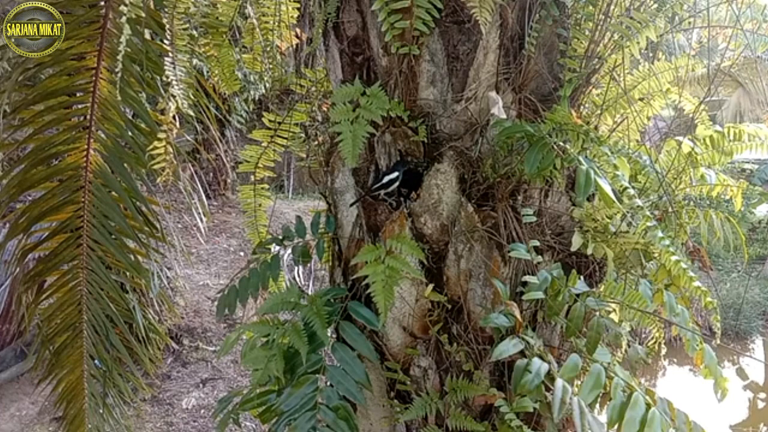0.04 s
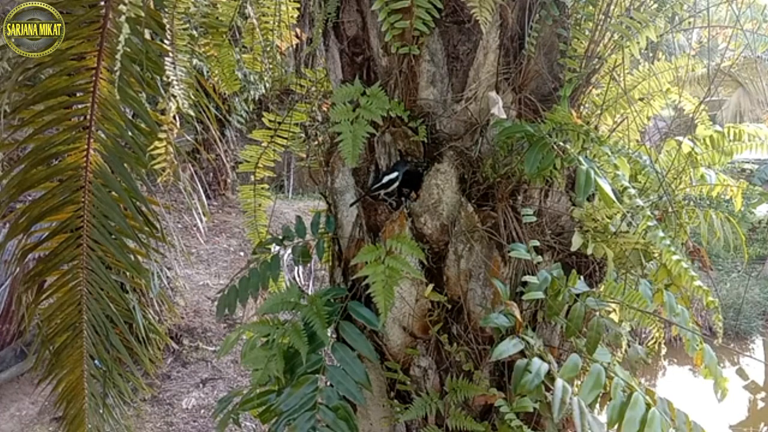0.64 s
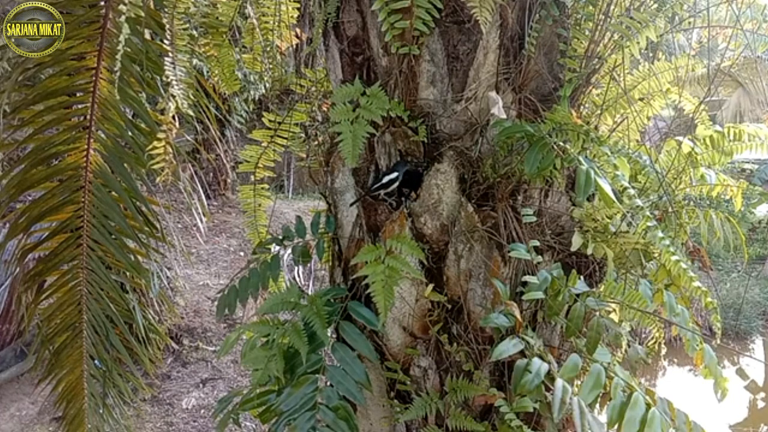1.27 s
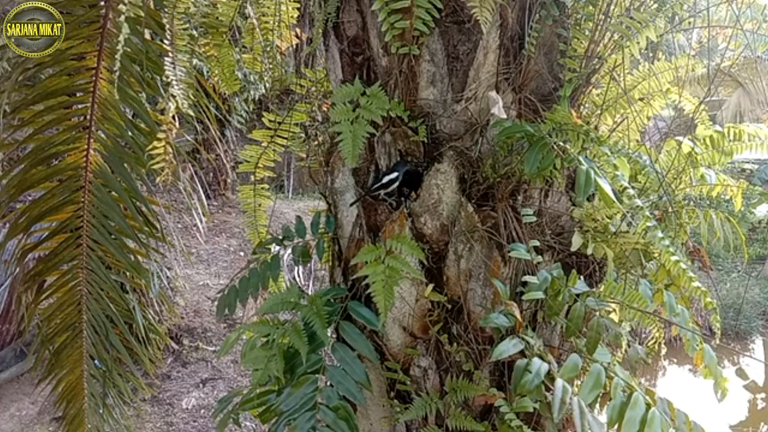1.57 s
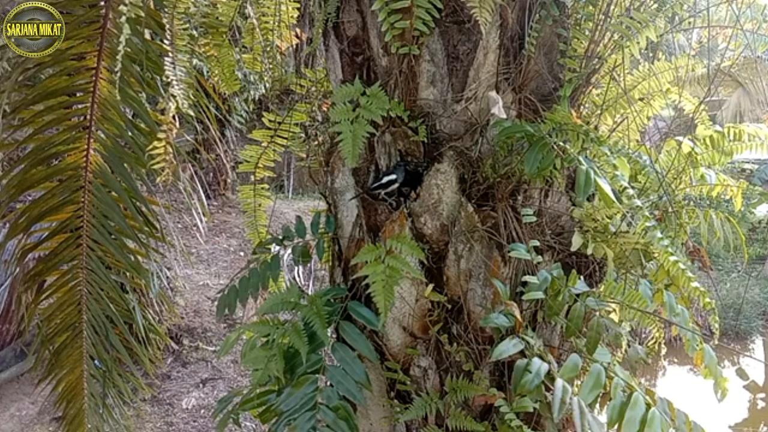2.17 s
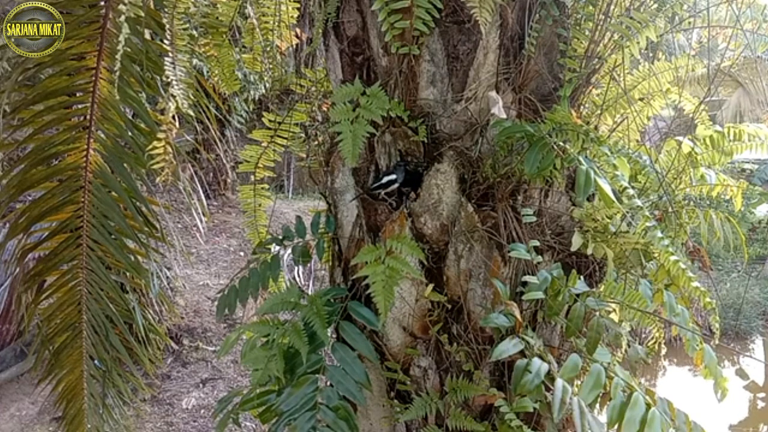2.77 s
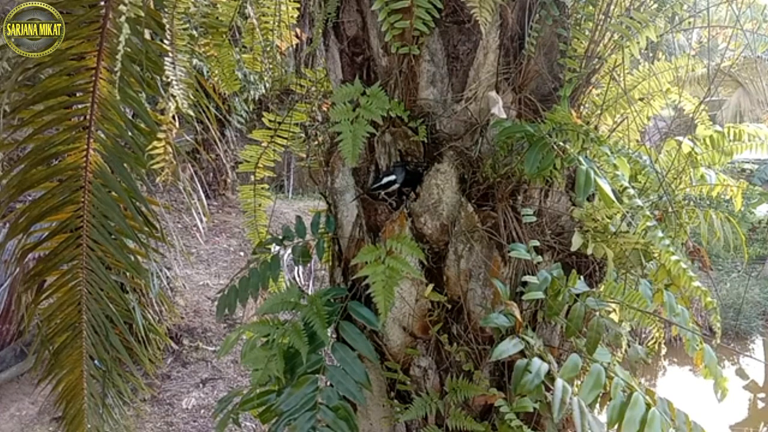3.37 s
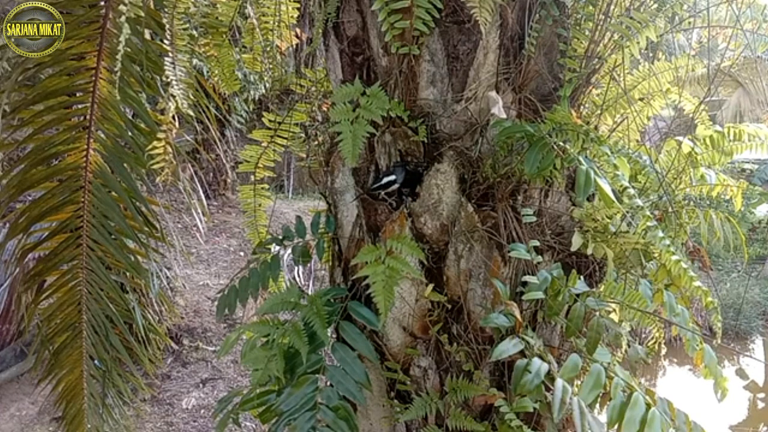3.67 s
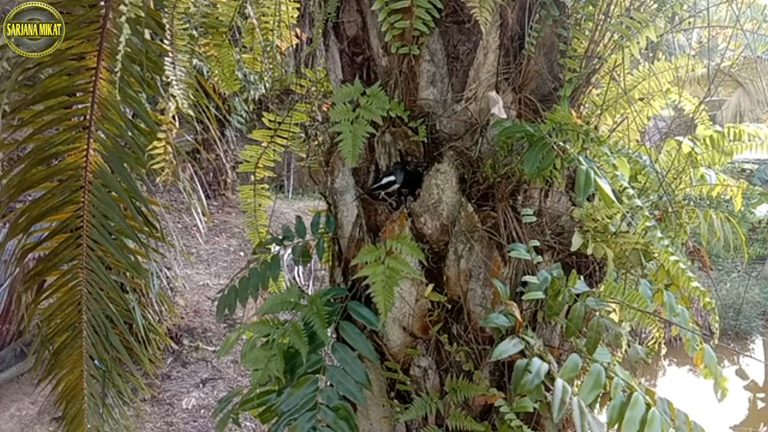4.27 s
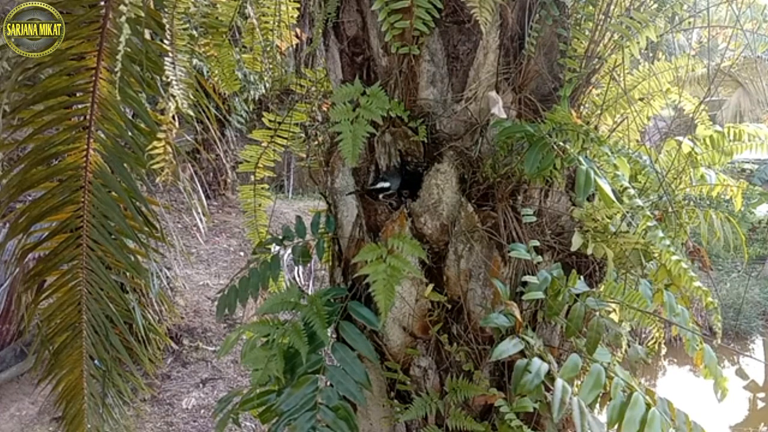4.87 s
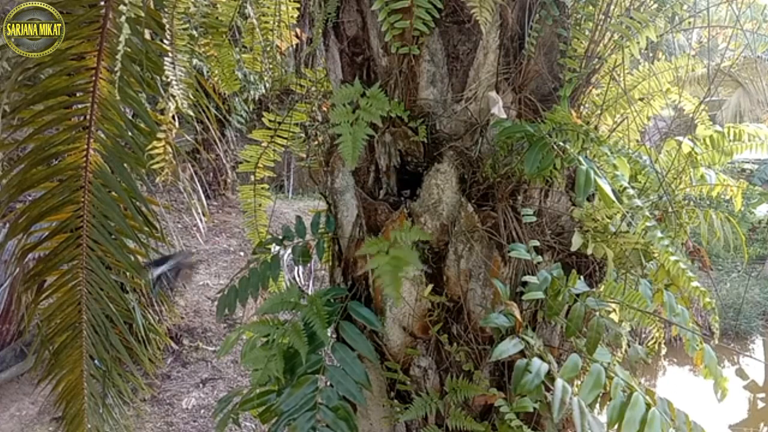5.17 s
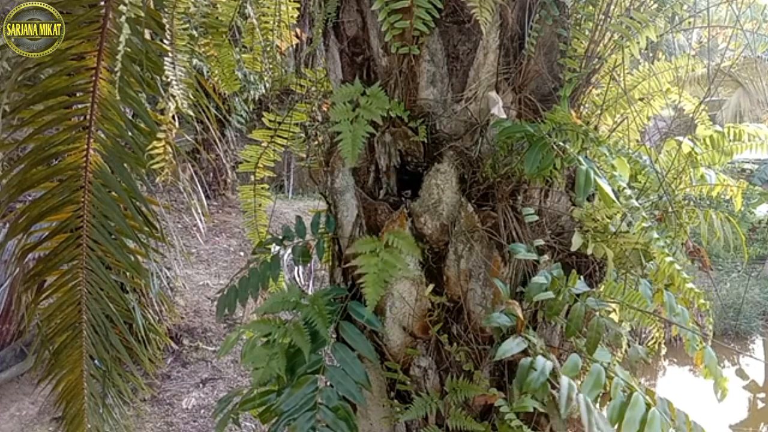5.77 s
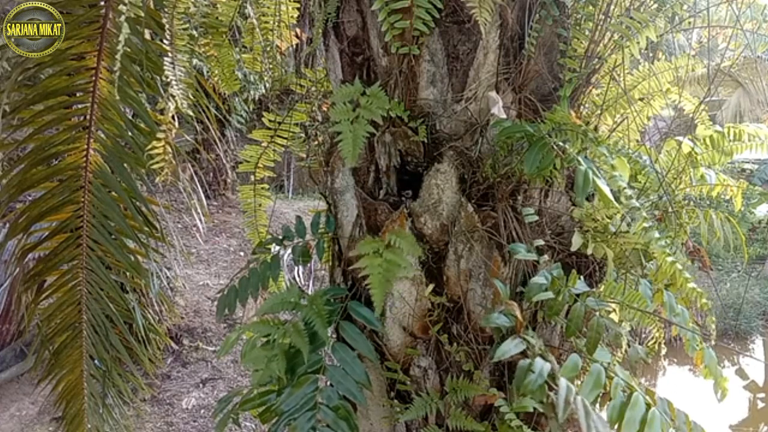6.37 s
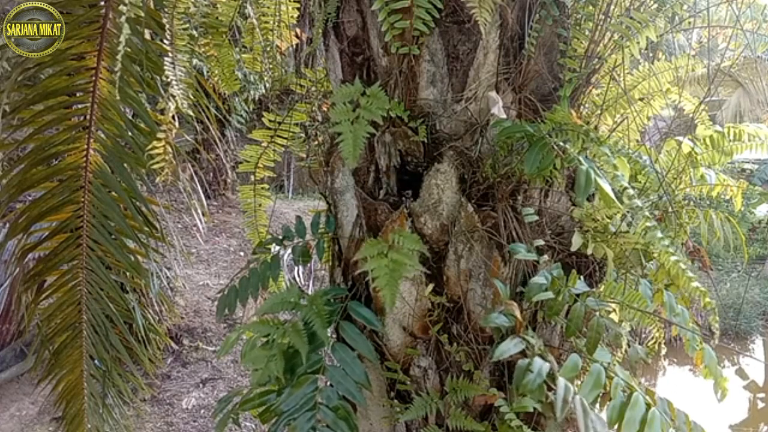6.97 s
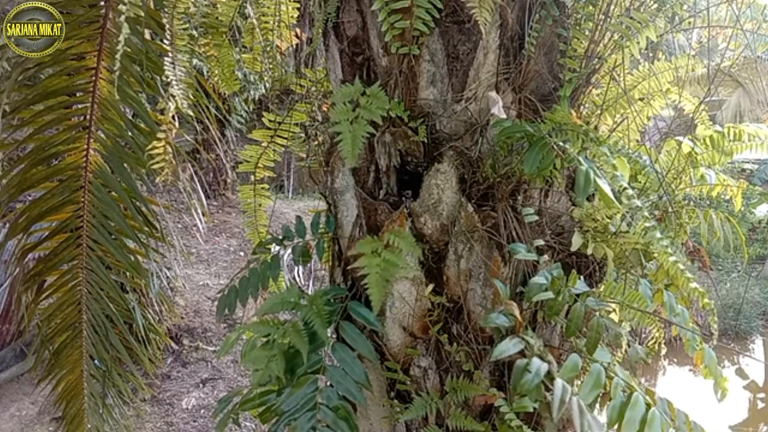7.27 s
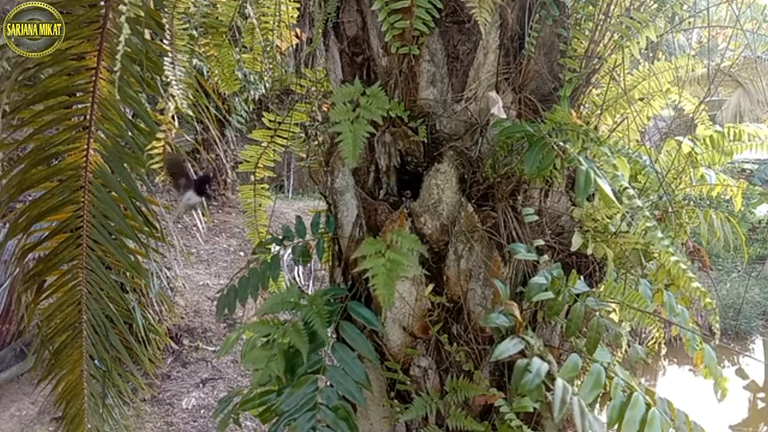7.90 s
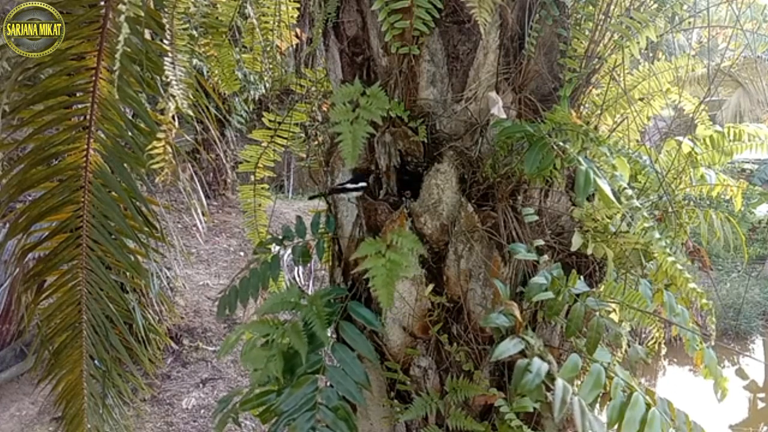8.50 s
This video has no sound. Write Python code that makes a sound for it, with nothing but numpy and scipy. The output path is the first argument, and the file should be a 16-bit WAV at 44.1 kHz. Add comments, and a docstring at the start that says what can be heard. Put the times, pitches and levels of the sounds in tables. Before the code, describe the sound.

Several chicks beg close by from a hollow in a palm trunk, their shrill, trilling calls overlapping from the start. They turn hoarser after a couple of seconds, then grow quieter and sparser in the second half. A parent bird's wings flutter very faintly away and later back. Farther off in the trees a songbird whistles and other birds peep over a soft outdoor hush and thin insect hiss.

```python
"""Magpie-robin chicks beg from a hollow in a palm trunk, their shrill calls overlapping from the start.
Each call opens as a thin squeak, swells into a trill of about 44 sweeps a second, sags and slides off.
Farther away a songbird whistles and other birds peep and coo over faint insects. After two seconds the
chicks grow hoarse; a far bird rasps, and the songbird returns. Past five seconds a parent flutters
away, the begging thins out, and near the end the parent flutters back."""
import sys
import numpy as np
from scipy import signal
from scipy.fft import rfft, irfft
from scipy.io import wavfile

SR = 44100
rng = np.random.default_rng(int(sys.argv[2]) if len(sys.argv) > 2 else 0)


def unload_wav(signal):
    """Save mono or channel-first audio to the path in sys.argv[1] as 16-bit WAV at rate SR, clipped to [-1, 1]."""
    wavfile.write(
        sys.argv[1],
        SR,
        np.round(np.clip(np.atleast_2d(signal).T, -1, 1) * 32767).astype(np.int16),
    )


N = 376613


def shrill_chick():
    """The highest voice in the nest, with the widest, most throbbing trill."""
    # Each row: start, length and time to the crest in seconds, crest pitch in Hz,
    # crest effort in dB, overtones in dB.
    calls = [(-0.2, 0.62, 0.32, 6325, -21.5, -25), (0.87, 0.51, 0.26, 6430, -18.5, -28),
             (2.02, 0.59, 0.31, 6380, -16.5, -22), (3.3, 0.64, .32, 6383, -17.5, -26),
             (4.32, 0.47, .22, 6375, -18, -41), (5.17, 0.53, .27, 6366, -18, -40),
             (6.28, 0.46, 0.13, 6460, -28, -29), (7.72, 0.37, 0.18, 6670, -39.5, -35)]
    # The contour of a call: squeak, build, sag and release, in seconds, Hz and dB as named.
    shape = dict(squeak_s=0.08, squeak_hz=833, squeak_db=20, build_hz=755, build_db=9, sag_hz=209.2, sag_db=5, release_s=.09, release_hz=577, release_db=35)
    return chick(calls, shape, sweep_hz=522, throb_db=7.8, second_db=-6, hiss_db=-34)


def harsh_chick():
    """A lower chick that rasps hard with the second side of its syrinx."""
    # Calls and contour, laid out as for the shrill chick.
    calls = [(0.2, 0.66, 0.19, 5273, -19, -14), (1.02, .56, 0.16, 5385, -19.5, -20.5),
             (2.02, .64, 0.16, 5430, -17.5, -14.5), (2.9, .59, 0.075, 5277, -21, -11.5),
             (3.72, .6, .18, 5175, -18, -15.5), (4.6, .47, .3, 5070, -22.5, -24),
             (5.37, 0.56, 0.33, 5153, -18, -18.5)]
    shape = dict(squeak_s=.13, squeak_hz=354.5, squeak_db=3, build_hz=-120, build_db=13, sag_hz=402.3, sag_db=4.5, release_s=0.055, release_hz=60, release_db=25)
    return chick(calls, shape, sweep_hz=457, throb_db=5.3, second_db=6, hiss_db=-39.5)


def soft_chicks():
    """Smoother voices that ease into a narrow trill and sometimes overlap."""
    # Calls and contour, laid out as for the shrill chick.
    calls = [(-0.25, .315, 0.29, 5856, -15, -31), (0.35, .44, .28, 5406, -13.5, -38),
             (1.59, .23, .15, 5630, -26, -35), (1.92, 0.81, 0.41, 5527, -17.5, -12.5),
             (2.57, 0.41, 0.3, 5475, -18.5, -52), (3.2, 0.31, 0.17, 5235, -16, -20),
             (4.05, .42, 0.32, 4980, -19.5, -54), (4.82, .45, 0.35, 5350, -20.5, -46),
             (5.6, 0.39, 0.3, 5340, -20, -32.5), (6.2, 0.54, .22, 5467, -21, -24),
             (6.5, 0.25, 0.26, 4880, -28, -36), (7.07, 0.51, 0.22, 5427, -26.5, -32),
             (7.2, 0.36, 0.23, 4956, -26.5, -49.5), (7.67, 0.44, 0.11, 5700, -42.5, -35),
             (8.05, .44, 0.21, 5405, -23, -29), (8.15, 0.33, 0.24, 4957, -22, -41)]
    shape = dict(squeak_s=.09, squeak_hz=360.7, squeak_db=27, build_hz=285.8, build_db=12.5, sag_hz=304.2, sag_db=10, release_s=.06, release_hz=201, release_db=15)
    return chick(calls, shape, sweep_hz=390, throb_db=4, second_db=-2, hiss_db=-41.5)


def chick(calls, shape, **voice):
    """A run of begging calls in one voice."""
    out = np.zeros(N)
    for call in calls:
        add(out, *begging_call(call, shape, **voice))
    return out


def begging_call(call, shape, sweep_hz, throb_db, second_db, hiss_db):
    """A whistle swept up and down by the two-sided syrinx; returns its start and its sound."""
    # The voices grow hoarse as the begging wears on. Each row: time in seconds, hoarseness in dB.
    hoarseness = [(1.6, -13), (2.1, -3.5), (5.9, -3), (6.3, 2.5)]
    # The colour of beak and hollow. Each row: frequency in Hz, gain in dB.
    beak_colour = [(3500, -12), (5500, -1.5), (6700, -7), (7800, 7.5), (9500, 3.5), (11100, -14.5),
                   (12000, -19.5), (15000, -14)]
    # The breath in a call. Each row: frequency in Hz, noise density in dB.
    hiss_colour = [(950, -31), (1270, 7.5), (1500, -13.5), (1850, -2), (2300, -6), (3150, 3), (3650, 14),
                   (4300, -5.5), (7000, 21.5), (9500, 2), (11000, 0), (12300, -2.5), (14900, 1)]
    slide_s, slide_hz, push_db = .04, 1336, 4
    throat_hz, throat_width_hz, throat_db = 2800, 210, -52
    start, length, crest_s, crest_hz, crest_db, overtone_db = call
    age, bend_hz, drop_db = call_contour(length, crest_s, **shape)
    size = len(age)
    hoarse_db = np.interp(start + age, *np.transpose(hoarseness))
    # the uneven trill slows and widens as the call builds
    rate_hz = 42 + 18 * np.exp(-age / .13) + 3.6 * noise_band(size, 0, 25)
    cycle = 2 * np.pi * (np.cumsum(rate_hz) / SR + rng.random())
    opening = 1 - np.exp(-(age / .13) ** 2)
    # each sweep jumps up quickly and falls more slowly; the last one plunges
    sweep = np.cos(cycle + .3 * np.cos(cycle))
    slide = np.clip(1 - (length - age) / slide_s, 0, 1)
    hz = crest_hz + bend_hz + sweep_hz * opening * (1 - slide) * sweep - slide_hz * slide
    jitter_hz = 70 * noise_band(size, 0, 60) + (130 - 80 * opening) * noise_band(size, 0, 450)
    phase = 2 * np.pi * np.cumsum(hz + jitter_hz) / SR
    # the fall of each sweep is its loud part; the hoarser the voice, the more air in the last slide
    pulse_db = throb_db * opening * (np.sin(cycle + .6) - .25)
    effort_db = crest_db - drop_db + (push_db + hoarse_db) * slide
    level = gain_of(effort_db + pulse_db + 1.9 * noise_band(size, 0, 80))
    # the second side of the syrinx rasps along lower down, and the two voices mix to a sum tone
    second_gate = opening ** 2 * np.clip(np.sin(cycle + .033) + .5, 0, 1)
    second_gain = gain_of(overtone_db + second_db + hoarse_db) * second_gate
    lower_phase = .8 * phase + noise_band(size, 0, 220)
    voice = np.sin(phase) + second_gain * (np.sin(lower_phase) + .32 * np.sin(phase + lower_phase))
    # overtones grow as the beak opens and dip a touch at the top of each sweep
    overtones = np.sin(2 * phase) + np.sin(3 * phase) / 2
    voice += gain_of(overtone_db - .5 * sweep) * opening ** 2 * overtones
    tone = np.sqrt(2) * level * coloured(voice, beak_colour)
    # air hisses through the open beak in time with the trill, growing more slowly than the tone
    hiss = gain_of(hiss_db + hoarse_db) * level ** .57 * coloured_noise(size, hiss_colour)
    # a hoarse throat rings low down
    throat_gain = gain_of(throat_db + 3 * hoarse_db + 3 * noise_band(size, 0, 5)) * level ** .7
    throat = throat_gain * noise_band(size, throat_hz, throat_width_hz)
    return start, (tone + hiss + throat) * signal.windows.tukey(size, .02)


def call_contour(length, crest_s, squeak_s, squeak_hz, squeak_db, build_hz, build_db,
                 sag_hz, sag_db, release_s, release_hz, release_db):
    """Pitch bend and effort drop through a call: opening squeak, build to the crest, sag, release."""
    age, build, sag = rise_and_fall(length, crest_s)
    squeak = np.clip(1 - age / squeak_s, 0, 1)
    release = np.clip(1 - (length - age) / release_s, 0, 1)
    bend_hz = squeak_hz * squeak - build_hz * build - sag_hz * sag - release_hz * release
    drop_db = squeak_db * squeak + build_db * build + sag_db * sag + release_db * release
    return age, bend_hz, drop_db


def songbird(edge_drop_db=14):
    """Each distant whistle glides to a turn, where it is loudest, and glides away."""
    # Each row: start, length and time to the turn in seconds, first, turn and last pitch in Hz,
    # level in dB.
    notes = [(0.12, 0.6, 0.081, 3300, 3665, 3192, -41), (0.639, 0.21, 0.068, 2820, 2997, 3120, -37.5),
             (0.984, 0.22, .145, 4390, 3340, 2440, -40), (1.264, 0.116, 0.094, 2400, 2442, 1960, -41.5),
             (1.442, 0.16, .065, 2780, 3090, 2110, -38.5), (1.613, 0.048, .05, 2250, 2590, 2620, -39),
             (4.569, 0.23, 0.1, 2260, 2377, 1800, -46.5), (4.963, 0.22, 0.12, 1927, 2085, 1994, -54),
             (5.143, 0.15, 0.076, 2060, 2844, 2890, -38.5)]
    out = np.zeros(N)
    for start, length, turn_s, first_hz, turn_hz, last_hz, db in notes:
        age, before, after = rise_and_fall(length, turn_s)
        hz = turn_hz + (first_hz - turn_hz) * before + (last_hz - turn_hz) * after
        level = gain_of(db - edge_drop_db * (before + after))
        add(out, start, level * whistle(hz, waver=.008) * signal.windows.tukey(len(age), .26))
    return out


def far_rasps(length_s=.047, width_hz=220):
    """Short hoarse notes of a far bird, each a puff of narrow noise."""
    # Each row: start in seconds, centre in Hz, level in dB.
    notes = [(3.422, 1500, -57.5), (3.596, 1370, -53.5), (3.731, 1510, -55), (7.104, 1600, -61)]
    out, size = np.zeros(N), int(length_s * SR)
    for start, hz, db in notes:
        add(out, start, gain_of(db) * noise_band(size, hz, width_hz) * np.hanning(size))
    return out


def far_birds():
    """Peeps and low coos from deep in the trees, each swelling and fading around one pitch."""
    # Each row: start and length in seconds, pitch in Hz, level in dB.
    notes = [(0.102, 0.26, 442, -78), (0.299, 0.59, 1300, -64), (0.8, 0.093, 1940, -69),
             (1.057, 0.29, 1626, -67), (2.859, 0.55, 414, -75), (3.414, 0.12, 2875, -59.5),
             (4.103, 0.14, 1940, -62), (5.45, 0.076, 1894, -61.5), (5.689, 0.24, 1240, -62.5),
             (6.941, 0.066, 432, -71), (7.733, 0.16, 3090, -62)]
    out = np.zeros(N)
    for start, length, hz, db in notes:
        size = int(length * SR)
        add(out, start, gain_of(db) * whistle(np.full(size, hz), waver=.032) * np.hanning(size))
    return out


def wings(beat_hz=17):
    """Each uneven wingbeat pushes a soft low puff of air and a brush of feathers."""
    # Bursts of wingbeats. Each row: start and length in seconds, level in dB.
    flights = [(5.22, 0.4, -68), (7.854, 0.74, -65.5)]
    # Air pushed by the wings. Each row: frequency in Hz, noise density in dB.
    feather_colour = [(30, -22), (130, 6), (350, -6), (1300, -1.5), (5000, -35)]
    out = np.zeros(N)
    for start, length, db in flights:
        size = int(length * SR)
        beats = np.cumsum(beat_hz + 7 * noise_band(size, 0, 12)) / SR
        puffs = np.sin(np.pi * beats) ** 2 * coloured_noise(size, feather_colour)
        add(out, start, gain_of(db) * puffs * np.hanning(size))
    return out


def air_and_insects(level_db=-65):
    """An outdoor hush with a thin insect band on top, the whole bed wavering slightly."""
    # Each row: frequency in Hz, noise density in dB.
    bed_colour = [(30, -16.5), (65, -8.5), (150, -1), (400, -4.5), (1000, -6), (1280, -7), (1600, -6),
                  (4000, -23.5), (7550, 5.5), (11500, -21), (15000, -12)]
    swell_db = np.interp(np.arange(N), np.linspace(0, N, num=40), rng.standard_normal(40))
    return gain_of(level_db + swell_db) * coloured_noise(N, bed_colour)


def foliage(x, wet_db, decay_s, echoes_per_s=2500):
    """Trunks and leaves scatter a sound into a dying tail of sparse echoes."""
    t = np.arange(SR) / SR
    echoes = rng.standard_normal(SR) * (rng.random(SR) < echoes_per_s / SR)
    tail = echoes * (t > .003) * gain_of(-60 * t / decay_s)
    return x + gain_of(wet_db) * signal.fftconvolve(x, tail / np.linalg.norm(tail))[:N]


def whistle(hz, waver):
    """A pure tone of rms 1 that wavers about a pitch curve."""
    wavering_hz = hz * (1 + waver * noise_band(len(hz), 0, 46))
    return np.sqrt(2) * np.sin(2 * np.pi * np.cumsum(wavering_hz) / SR)


def rise_and_fall(length, crest_s):
    """A sound's own clock, the build still to come (1 to 0) and the decline after its crest (0 to 1)."""
    age = np.arange(0, length, 1 / SR)
    build = np.clip(1 - age / crest_s, 0, 1)
    decline = np.clip((age - crest_s) / max(length - crest_s, 1 / SR), 0, 1)
    return age, build, decline


def noise_band(size, hz, width_hz):
    """Noise of rms about 1 in a bell-shaped band; around 0 Hz it is a random wander."""
    bins = np.fft.rfftfreq(SR * 2, 1 / SR)
    bell = np.exp(-.5 * ((bins - hz) / width_hz) ** 2)
    return unit_rms(irfft(rfft(rng.standard_normal(SR * 2)) * bell))[:size]


def coloured_noise(size, points):
    """Noise of rms 1 shaped by an EQ curve."""
    return unit_rms(coloured(rng.standard_normal(size), points))


def coloured(x, points):
    """Filters by an EQ curve of (Hz, dB) points."""
    hz, db = np.transpose(points)
    bins = np.fft.rfftfreq(len(x), 1 / SR)
    curve_db = np.interp(np.log(bins + 1), np.log(hz), db)
    return irfft(rfft(x) * gain_of(curve_db), len(x))


def unit_rms(x):
    """Scales to rms 1."""
    return x / np.sqrt(np.mean(x ** 2) + 1e-20)


def gain_of(db):
    """Decibels to gain."""
    return 10 ** (np.asarray(db) / 20)


def add(mix, start_s, sound):
    """Mixes a sound in, trimming what falls outside the mix."""
    start = round(start_s * SR)
    sound = sound[max(-start, 0):]
    part = mix[max(start, 0):][:len(sound)]
    part += sound[:len(part)]


def scene():
    """The nest close by, the other birds deep in the trees; both channels alike."""
    nest = shrill_chick() + harsh_chick() + soft_chicks()
    far = foliage(songbird() + far_birds() + far_rasps(), wet_db=-.5, decay_s=.4)
    near = foliage(nest, wet_db=-9.5, decay_s=.12)
    mono = (near + far + wings() + air_and_insects()) * signal.windows.tukey(N, .001)
    return np.array([mono, mono])


def record(dry, cutoff_hz=15150):
    """A steep low-pass trims the very top of the treble."""
    lowpass = signal.firwin(511, cutoff_hz, window=("kaiser", 9), fs=SR)
    return signal.oaconvolve(dry, lowpass[None], "same")


dry = scene()
out = record(dry)
unload_wav(out)
```